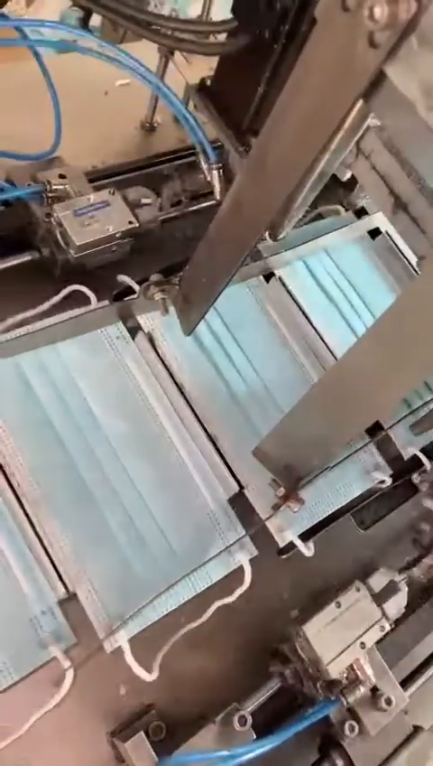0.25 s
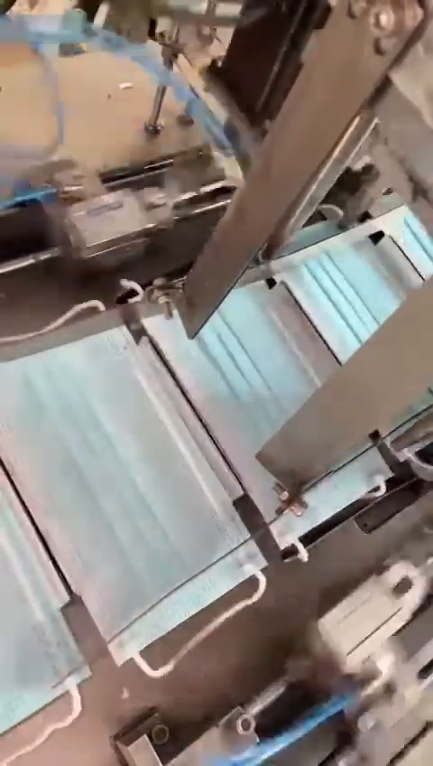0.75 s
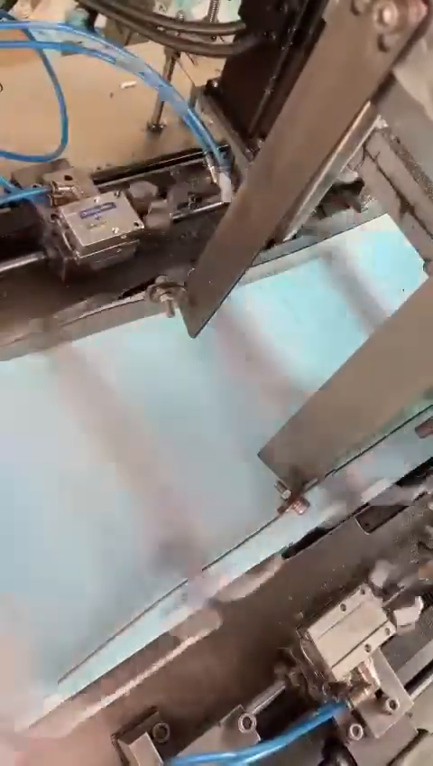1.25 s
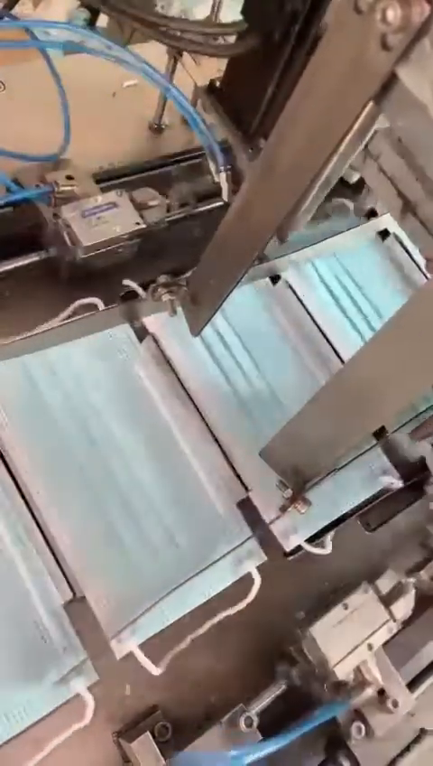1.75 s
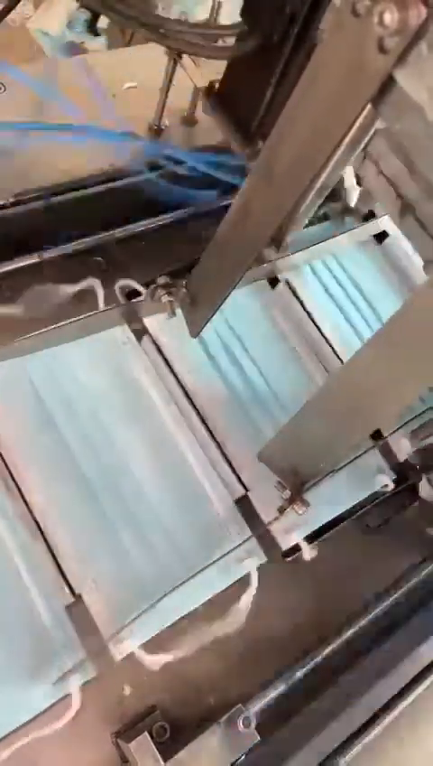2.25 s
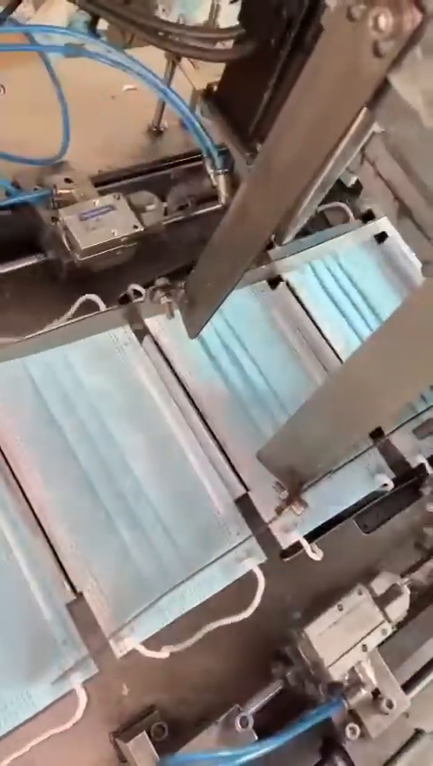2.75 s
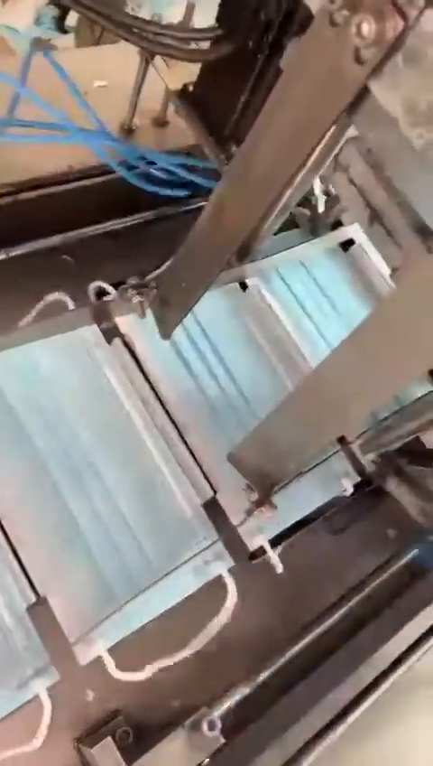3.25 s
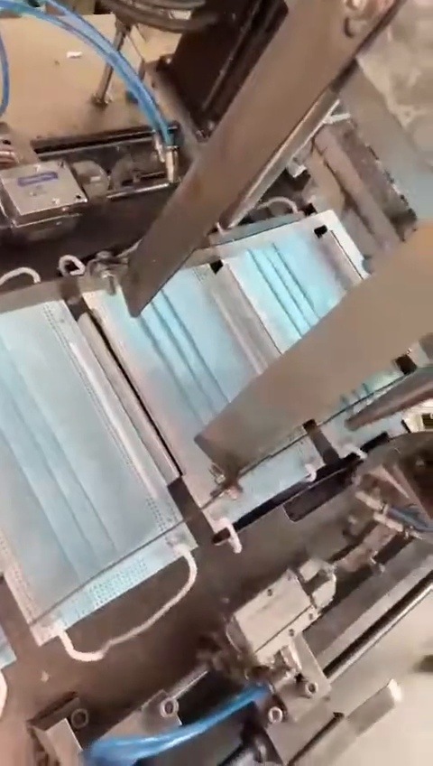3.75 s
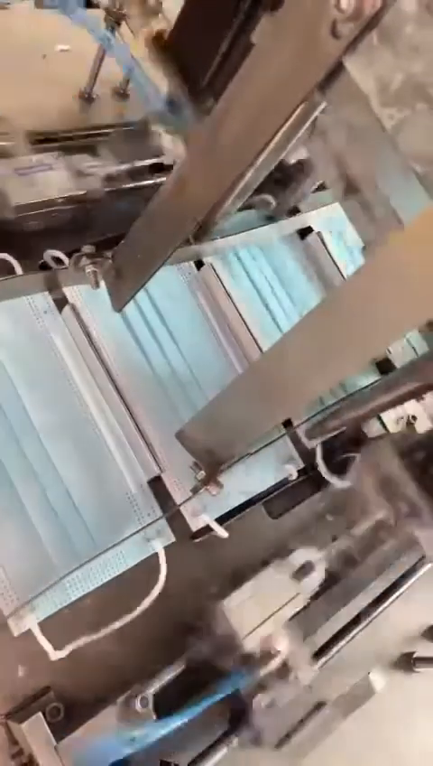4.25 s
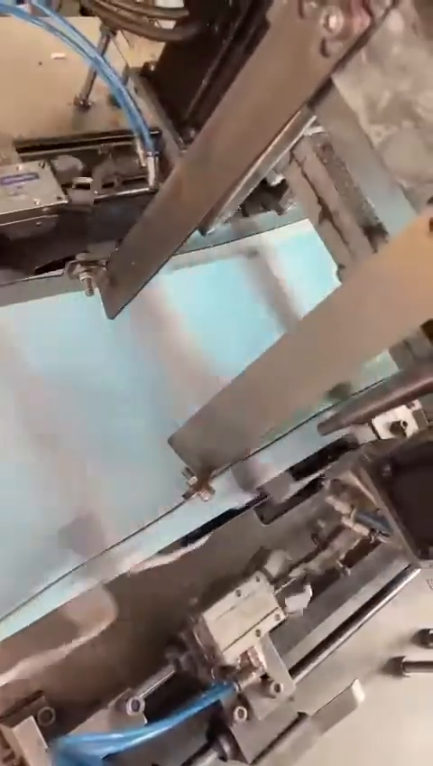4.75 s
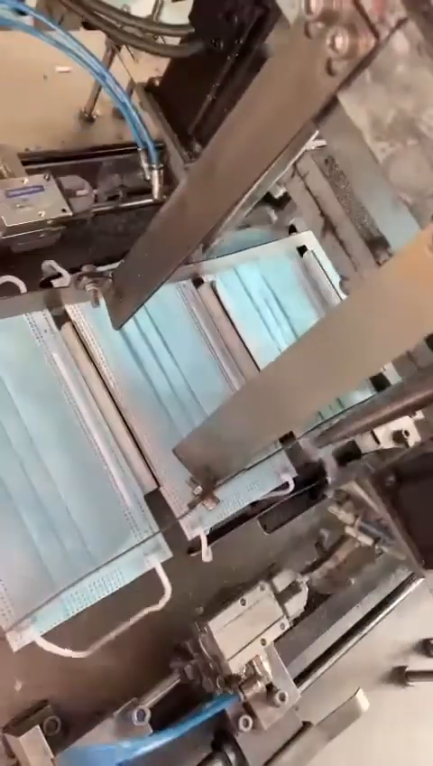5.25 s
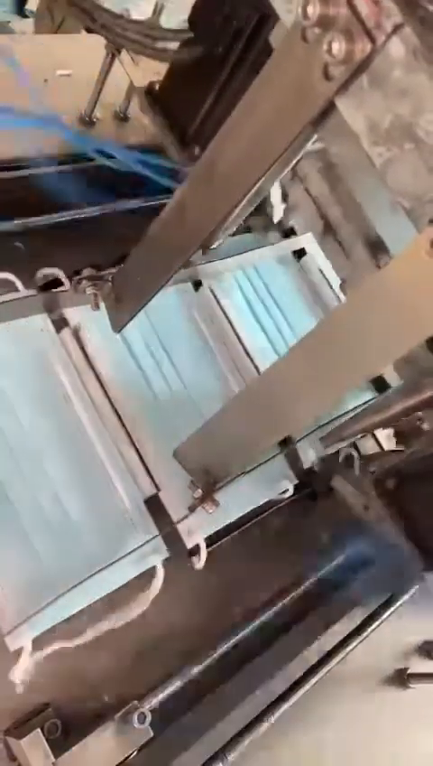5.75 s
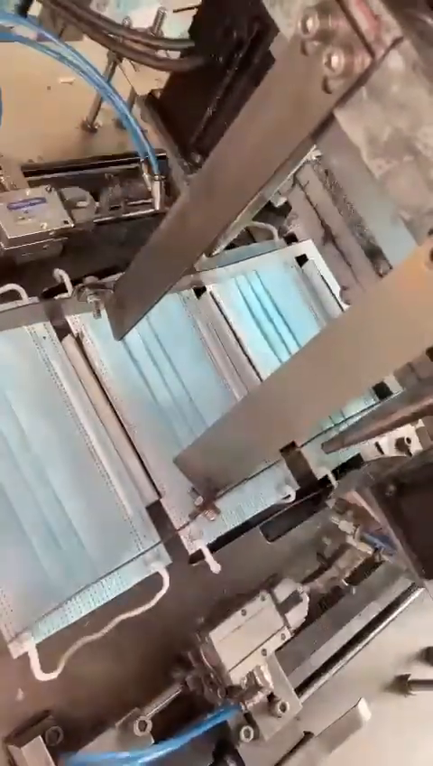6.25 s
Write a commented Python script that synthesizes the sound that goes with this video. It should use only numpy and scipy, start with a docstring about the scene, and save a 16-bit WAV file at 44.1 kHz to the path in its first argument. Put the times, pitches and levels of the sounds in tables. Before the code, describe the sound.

A face mask welding machine clatters close by in a factory, repeating the same cycle about every 0.9 seconds for just over six seconds. It opens with a bright metal clamp clack, a quick double knock and, at 0.2 seconds, a latch snap with a brief low panel hum. Crackly valve ticks follow, and a carriage rattles along its rail and slams into its stop at 0.6 seconds. Straight after, a dry crack starts a short, very high, stuttering welding squeal over soft low thumps. The squeal returns at about 1.5, 2.4, 3.3, 4.2, 5.0 and 5.9 seconds, each time just after a slam and followed by the clack, double knock and snap. Underneath, sliding parts rattle, the machine body rumbles and spent air hisses, swelling and easing with each cycle. The impacts carry a short, light room reflection, and the pace never changes.

```python
"""An ear-loop welding station on a factory floor, heard from close by, cycling every 0.88 s.
Each cycle opens on a valve tick; air cylinders throw the slides, and a carriage rushes along its rail
and slams into its stop. An ultrasonic horn lands and squeals for a seventh of a second as it bounces
on the anvil, stuttering over low thumps as the plastic melts. Then a clamp clacks, a slide seats with
a double knock and a latch sets a panel humming. Rattle, rumble and spent air run underneath."""
import sys
import numpy as np
from scipy import signal
from scipy.io import wavfile
from scipy.ndimage import uniform_filter1d

SR = 44100
rng = np.random.default_rng(int(sys.argv[2]) if len(sys.argv) > 2 else 0)


def transcribe(u):
    """Save the signal u as a 16-bit wav file named by the first command-line argument.

    u: samples, shape (n,) or (channels, n), limited to [-1, 1]; the rate is SR.
    q: integer samples, one column per channel.
    """
    v = np.clip(np.atleast_2d(u).T, -1, 1)
    q = np.round(v * 32767).astype(np.int16)
    wavfile.write(sys.argv[1], SR, q)


N = 286209
T = np.arange(N) / SR

# Welds, with their tones on hard plastic: (start [s], end [s], melt start [s], melt end [s],
# top tone [dB], low tone [dB], middle tone [dB])
WELDS = [(.655, .772, 0.72, 0.74, -28, -34, -35.5), (1.536, 1.673, 1.57, 1.61, -28, -34, -37),
         (2.381, 2.523, 2.43, 2.49, -25, -43, -32.5), (3.262, 3.407, 3.314, 3.365, -24.5, -46, -32),
         (4.151, 4.283, 4.201, 4.24, -31, -34, -42), (5.028, 5.171, 5.074, 5.14, -27, -30, -36.5),
         (5.903, 6.048, 5.952, 6, -28, -30.5, -38.5)]
# The horn's landings: (time [s], relative level [dB])
HORN_LANDINGS = [(0.655, -19.5), (1.5355, -25.5), (2.393, -24), (3.275, -23), (4.152, -23.5), (5.0369, -26),
                 (5.915, -26)]
# Machine cycles: (start [s], horn valve delay [s], rattle trim [dB], rumble trim [dB], rush trim [dB])
CYCLES = [(-.5405, .298, -0.5, 1.5, 0), (0.3414, .301, 0.5, 1, 0), (1.2201, .299, 1.5, 1.5, -0.5),
          (2.0779, .297, -0.5, 0.5, -2.5), (2.9616, .290, -1.5, 0.5, 0.5), (3.8374, .302, 1.5, 0.5, -1),
          (4.7243, .295, -0.5, -0.5, -1), (5.601, .2985, 0, -0.5, -3.5), (6.4834, .298, -6, 0, 0)]


def horn_squeal():
    """The unheard drive and the horn's bounce mix into four tones that close in on fifths of the drive."""
    drive_hz, hard_hz, melted_hz = 19889, 8206, 7960   # the bounce slows as the plastic melts
    wobble = drift(154)
    flickers = [drift(230) for _ in range(4)]
    apart = horn_skips()
    contact = amp(-22 * uniform_filter1d(apart, size=40))
    rebound = signal.lfilter([.004], [1, -.996], apart)   # after a gap the bounce restarts fast
    rasp = band(rng.standard_normal(N), 2600, 6100)
    grit = drift(420)   # uneven bounces roughen each tone
    out = np.zeros(N)
    for weld, (landing_s, _) in zip(WELDS, HORN_LANDINGS):
        start, end = weld[:2]
        on = slice(round(start * SR), round(end * SR))
        t = T[on]
        melt = np.interp(t, weld[2:4], [0, 1])
        bounce_hz = hard_hz + melt * (melted_hz - hard_hz + 150 * rebound[on])
        bounce_hz += (10 + 70 * melt) * wobble[on]
        bounce = 2 * np.pi * np.cumsum(bounce_hz) / SR
        drive = 2 * np.pi * drive_hz * t
        phases = drive - bounce, bounce, drive - 2 * bounce, 3 * bounce - drive
        levels = tone_levels(t, melt, weld, landing_s)
        tones = sum(level * amp((2.05 + 0.65 * melt) * flicker[on]) * np.sin(phase)
                    for level, phase, flicker in zip(levels, phases, flickers))
        tones *= 1 + (0.14 + 0.21 * melt) * grit[on]
        gate = np.clip(np.minimum(t - start, end - t) * 1500, 0, 1)
        out[on] += contact[on] * gate * (tones + amp(-43 + 2.05 * melt) * rasp[on])
    return out


def tone_levels(t, melt, weld, landing_s):
    """Top, bounce, low and middle tone: the low starts at first touch, the rest swell on landing."""
    start, _, melt_s, _, top_db, low_db, middle_db = weld
    touch_s, top_fade_db_per_s = .012, -190
    landed = np.clip((t - landing_s) / 0.009 + 1, .1, 1)
    top = amp(top_db + top_fade_db_per_s * np.maximum(t - melt_s, 0))
    # The first touch sounds brighter.
    bounce_db = np.interp(t - landing_s, [0, 2 * touch_s], [-37, -44])
    low_db = np.interp(t - start, [touch_s, 2 * touch_s], [-30, low_db])
    # Glide to the levels on melted plastic; the low tone gets there first.
    bounce = amp(bounce_db + melt * (-39.5 - bounce_db))
    low = amp(low_db + np.minimum(1.9 * melt, 1) * (-42 - low_db))
    middle = amp(middle_db + melt * (-34.5 - middle_db))
    return landed * top, landed * bounce, low, landed * middle


def horn_skips():
    """Share of contact lost: once the plastic softens, the horn skips at a near-steady beat."""
    # Longer, full losses of contact: (time [s], length [ms])
    breaks = [(1.543, 7.8), (1.554, 5.5), (1.563, 5.83), (1.574, 4.7), (1.628, 11.2), (1.652, 8.9),
              (4.186, 13.5), (4.245, 28), (5.142, 7.04), (6.009, 8.4), (6.032, 4.76)]
    skips_per_s, skip_s, depth = 80, .0021, .75
    softening = sum((T > melt_s) & (T < end) for _, end, melt_s, *_ in WELDS)
    rate = softening * skips_per_s * (1 + 0.151 * drift(40))
    skips = np.diff(np.floor(np.cumsum(rate / SR)), prepend=0) > 0
    apart = depth * np.minimum(np.convolve(skips, np.ones(round(skip_s * SR)))[:N], 1)
    for s, ms in breaks:
        apart[round(s * SR):round((s + ms / 1000) * SR)] = 1
    return apart


def horn_landing():
    """The horn meets the anvil with a short, dry crack."""
    # Horn on anvil: (pitch [Hz], level [dB], t60 [s])
    modes = [(1560, -4.5, 0.0087), (2680, -7, 0.011), (4930, -4.5, 0.013), (6860, -4, 0.0089),
             (9360, -27.5, 0.0083), (11370, -14, 0.015)]
    return strike(HORN_LANDINGS, modes, gain_db=1.5, crack_db=20, panel_db=-7,
                  rise_s=0.00053, length_s=.004, click=0.4, fall_db=-2.5)


def weld_thumps():
    """Soft low thumps, a couple of swings each, during each squeal and as it stops."""
    # Thumps during the squeals: (time [s], relative level [dB], pitch [Hz])
    during_squeal = [(0.658, -25, 69.4), (0.719, -21, 99.4), (0.744, -26, 106), (0.777, -33, 70.0),
                     (2.396, -27, 108), (5.06, -34.5, 90), (5.914, -29, 94.5), (1.58, -24.5, 83.4),
                     (1.613, -25.5, 113), (1.655, -23, 78.1), (2.442, -22.5, 142), (2.46, -25, 87.5),
                     (3.323, -25, 107), (3.348, -20, 165), (3.365, -28, 103), (4.153, -22.5, 68),
                     (4.169, -24.5, 94.2), (4.224, -22.5, 157.5), (4.244, -24.5, 77.5), (5.103, -22, 78.1),
                     (5.125, -21.5, 99.5), (5.141, -20, 103.3), (5.979, -23, 106), (6.005, -27, 64.6)]
    at_squeal_end = [(end - .012, -31, 60) for _, end, *_ in WELDS]
    out = np.zeros(N)
    for s, db, hz in list(during_squeal) + at_squeal_end:
        turns = np.arange(int(3 * SR / hz)) * hz / SR
        envelope = amp(db + 12.5) * turns * np.exp(-turns / 0.44)
        out[round(s * SR):][:len(turns)] += envelope * np.sin(2 * np.pi * turns)
    return out


def carriage_slam():
    """The carriage crunches into its stop and shakes the frame."""
    # Slams: (time [s], relative level [dB])
    hits = [(0.593, -20.5), (1.472, -21.5), (2.328, -21.5), (3.214, -21.5), (4.091, -22), (4.978, -21.5),
            (5.852, -22)]
    # Carriage and stop: (pitch [Hz], level [dB], t60 [s])
    modes = [(834, -6.5, 0.027), (1726, -6.5, 0.051), (2530, 1, 0.023), (2914, -1, 0.025),
             (3558, 8, 0.0071), (4010, -3, 0.011), (5075, -5, 0.02), (7480, -11.5, 0.022),
             (8650, -7, 0.014), (10700, -34, .025)]
    crunch = strike(hits, modes, gain_db=-1.5, crack_db=13, panel_db=-2.5,
                    rise_s=0.0039, length_s=0.02, click=0.13, fall_db=-2.5)
    return crunch + frame_thud(hits, delay_s=0.0019, gain_db=-9.5)


def clamp():
    """The clamp strikes with a bright, chattering clack."""
    # Clacks: (time [s], relative level [dB])
    hits = [(0.001, -23), (0.8741, -24.5), (1.764, -24), (2.621, -25), (3.505, -25.5), (4.3825, -23),
            (5.2675, -24), (6.1462, -24)]
    # The clamp's ring: (pitch [Hz], level [dB], t60 [s])
    modes = [(1804, -21, 0.12), (2554, 0, 0.041), (2633, -0.5, 0.028), (3240, 1.5, 0.02),
             (3597, 4.5, 0.023), (4200, -19, 0.029), (5050, -6.5, 0.037), (5370, -10.5, 0.038),
             (7470, -8.5, 0.098), (8680, -7.5, 0.048), (11000, -25, 0.05)]
    return strike(hits, modes, gain_db=-3, crack_db=20, panel_db=-3.5,
                  rise_s=0.00057, length_s=.021, click=0.36, fall_db=-4.5)


def slide_seat():
    """A slide seats with two knocks, the second harder, and nudges the frame."""
    # Knocks: (time [s], relative level [dB])
    hits = [(0.045, -22), (0.06, -17), (0.926, -24), (0.939, -17), (1.814, -22.5), (1.83, -18),
            (2.673, -22), (2.688, -18.5), (3.556, -25.5), (3.571, -19), (4.432, -26.5), (4.447, -22),
            (5.319, -32), (5.334, -22), (6.197, -26.5), (6.211, -19)]
    # The seat's ring: (pitch [Hz], level [dB], t60 [s])
    modes = [(465, -10, 0.057), (670, -5.5, 0.051), (774, -4.5, 0.044), (1670, -3, 0.0087),
             (2500, -12, 0.011), (3004, 7, 0.0096), (3650, -2.5, 0.0177), (4650, -19, 0.014),
             (7530, -11, 0.045), (8700, -15, 0.055), (9240, -8, 0.046), (10700, -34, .04)]
    knocks = strike(hits, modes, gain_db=-6, crack_db=14, panel_db=4,
                    rise_s=0.00075, length_s=.022, click=0.54, fall_db=-8)
    return knocks + frame_thud(hits, delay_s=0.00315, gain_db=-20)


def latch():
    """The latch snaps, and a soft late push sets the panel behind it humming."""
    # Snaps: (time [s], relative level [dB])
    hits = [(0.182, -25), (1.066, -25), (1.95, -25.5), (2.806, -25), (3.689, -24.5), (4.564, -26),
            (5.451, -27), (6.33, -25.5)]
    # The latch's ring: (pitch [Hz], level [dB], t60 [s])
    modes = [(756.2, -14.5, 0.072), (1520, -38, 0.043), (1930, 4.5, 0.014), (2860, -1.5, 0.014),
             (3450, -1, 0.012), (4030, -20, .02), (4942, -2, 0.0098), (7300, -2.5, 0.011),
             (9700, -54, .015), (11400, -9, 0.0136)]
    snap = strike(hits, modes, gain_db=1, crack_db=11, panel_db=1.5,
                  rise_s=0.00018, length_s=0.023, click=0.43, fall_db=-28)
    panel_hz = 229.5
    hum = ring(blows(hits, delay_s=.012, gain_db=12.8), panel_hz, t60=0.15)
    return snap + ring(hum, panel_hz, t60=0.026) * 60 / SR   # ringing twice softens the attack


def strike(hits, modes, gain_db, crack_db, panel_db, **bounce_shape):
    """Bounces ring the body, leak out as a broad crack and stir the panels' countless small modes."""
    push = chatter(hits, **bounce_shape)
    t = np.arange(2600) / SR
    panel_tail = band(rng.standard_normal(len(t)), 490, 3820) * decay(t, 0.0613)
    panels = signal.fftconvolve(push, panel_tail)[:N]
    body = sum(amp(db) * ring(push * amp(2 * drift(3.8)), hz, t60) for hz, db, t60 in modes)
    crack = band(push, 1320, 7300)
    return amp(gain_db) * (body + amp(crack_db) * crack + amp(panel_db) * panels)


def chatter(hits, rise_s, length_s, click, fall_db):
    """Each contact is a first click, then a run of small bounces that swells, fades and stops."""
    push = np.zeros(N + SR)
    t = np.arange(int(length_s * SR) + 2) / SR
    envelope = np.minimum(t / rise_s, 1) * amp(fall_db * t / length_s) / np.sqrt(len(t))
    for s, db in hits:
        bounces = envelope * rng.standard_normal(len(t)) * amp(2.67 * rng.standard_normal(len(t)))
        bounces[1] += click
        push[round(s * SR):][:len(t)] += amp(db) * bounces
    return push[:N]


def frame_thud(hits, delay_s, gain_db):
    """A heavy contact reaches the frame as one blunt blow."""
    # The frame's low ring: (pitch [Hz], level [dB], t60 [s])
    modes = [(110, -16, 0.46), (217.3, -5.5, 0.19), (262, 4, 0.1), (437.5, -2.5, 0.14)]
    push = blows(hits, delay_s, gain_db)
    return sum(amp(db) * ring(push, hz, t60) for hz, db, t60 in modes)


def valve_ticks():
    """Valves and pawls tick in sharp bursts of crackle; the dull part lasts a little longer."""
    # Ticks of one cycle: (time in cycle [s], relative bright level [dB], relative dull level [dB])
    ticks = [(0, -31, -35.5), (.059, -24.5, -29.5), (.096, -34, -33.5), (.126, -35, -36),
             (.183, -31.5, -28.5), (.237, -49, -28), (.49, -60, -45), (.58, -23, -28), (.80, -56, -61.5),
             (.831, -43, -49)]
    out = np.zeros(N + SR)
    t = np.arange(2000) / SR
    for start, horn_valve_s, *_ in CYCLES:
        for after, bright_db, dull_db in list(ticks) + [(horn_valve_s, -26, -35.5)]:
            crackle = rng.standard_normal((2, len(t))) * amp(rng.standard_normal())
            crackle[:, 1] *= 3.2 * (bright_db > -28)   # the strong ones open with a snap
            bright = band(crackle[0] * (decay(t, 0.0172) + 0.18 * decay(t, 0.076)), 3700, 14000)
            dull = band(crackle[1] * (decay(t, 0.028) + 0.33 * decay(t, 0.091)), 820, 4130)
            tick = amp(bright_db - 7) * bright + amp(dull_db - 0.5) * dull
            if 0 < start + after < N / SR:
                out[round((start + after) * SR):][:len(t)] += tick
    return out[:N]


def rail_rush():
    """Before the slam, ball bearings rattle densely into the resonances of the rail."""
    # The carriage's run: (time in cycle [s], level [dB])
    swell = [(.12, -58.5), (.13, -42), (.19, -32), (.235, -50.5), (.25, -38)]
    # Rail resonances: (centre [Hz], width [Hz], level [dB])
    resonances = [(970, 560, -2.5), (1640, 480, -3), (2040, 640, -4), (2600.4, 216, 4), (3100, 510, -5.5),
                  (3720, 270, -5.5), (4946, 1060, -13), (7420, 460, -20), (9226, 140, -14.5)]
    clock, *_, trim_db = cycle_clock()
    level = amp(np.interp(clock, *np.transpose(swell), left=-120, right=-120) + trim_db)
    balls = rng.standard_normal(N) + .9 * grains(per_s=1200, spread_db=4.5)
    rail = sum((-1) ** k * amp(db) * band(balls, hz - width / 2, hz + width / 2)
               for k, (hz, width, db) in enumerate(resonances))
    return uniform_filter1d(level, size=300) * unit_rms(rail)


def slide_motion():
    """Slides rattle along their rails, the frame rumbles, spent air hisses."""
    # Tone colours of slides, frame and air: (frequency [Hz], relative density [dB])
    rattle_colour = [(240, -41), (400, -11), (573, 4), (782, -5.5), (1040, 0.5), (1260, 7), (1390, 0),
                     (2590, 1.5), (7000, -22.5), (9100, -43), (15400, -120)]
    rumble_colour = [(18, -64), (30, -27), (64, -13.5), (119, 3), (156, -10.5), (233, -2), (310, -8),
                     (658, -15.5), (900, -17), (1170, -33), (1980, -120)]
    hiss_colour = [(2060, -13.5), (3500, -2.5), (4450, -11), (5090, -7), (6400, -9), (10700, -13.5),
                   (12000, -36), (12500, -80), (16300, -106), (22000, -120)]
    # The slides' stroke: (time in cycle [s], rattle [dB], rumble [dB], hiss [dB])
    stroke = [(0, -47.5, -48, -54), (.08, -49.5, -49.5, -49.5), (.21, -40, -47, -47.5),
              (.30, -55, -43, -50), (.42, -41.5, -40.5, -54.5), (0.529, -48.5, -54.5, -54.5),
              (0.669, -53, -43.5, -57), (.74, -56.5, -52.5, -62.5), (.86, -57.5, -52.5, -59.5)]
    times, *curves = np.transpose(stroke)
    clock, rattle_trim_db, rumble_trim_db, _ = cycle_clock()
    rattle_db, rumble_db, hiss_db = [np.interp(clock, times, curve) for curve in curves]
    gritty = rng.standard_normal((2, N)) + .7 * grains(per_s=1500, spread_db=4.5)
    rattle = coloured(rattle_colour, gritty, flicker_db=4)
    rumble = coloured(rumble_colour, rng.standard_normal((2, N)), flicker_db=4.5)
    hiss = coloured(hiss_colour, gritty, flicker_db=4.5)
    return (amp(rattle_db + rattle_trim_db) * rattle + amp(rumble_db + rumble_trim_db) * rumble
            + amp(hiss_db) * hiss)


def hall(x):
    """Dense reflections off the machine bed and walls."""
    t = np.arange(int(.4 * SR)) / SR
    envelope = decay(t, t60=0.317) * np.minimum(t / 0.0011, 1)
    tail = band(rng.standard_normal(len(t)), 260, 10500) * envelope
    return signal.fftconvolve(x, tail / np.sqrt(np.sum(tail ** 2)))[:N]


def cycle_clock():
    """Time since the cycle began, and that cycle's rattle, rumble and rush trims."""
    rows = np.array(CYCLES)
    start, _, *trims_db = rows[np.searchsorted(rows[:, 0], T, side="right") - 1].T
    return T - start, *trims_db


def coloured(spectrum, noise_pair, flicker_db):
    """Third-octave bands of noise, each at its own level and flickering; rms 1."""
    hz, db = np.transpose(spectrum)
    edges = np.geomspace(hz[0], hz[-1], num=round(3 * np.log2(hz[-1] / hz[0])) + 1)
    flickers = [drift(24.6) for _ in range(3)]
    out = 0
    for k, (low, high) in enumerate(zip(edges, edges[1:])):
        level_db = np.interp(np.log(low * high) / 2, np.log(hz), db)
        out += amp(level_db + flicker_db * flickers[k % 3]) * band(noise_pair[k % 2], low, high)
    return unit_rms(out)


def blows(hits, delay_s, gain_db):
    """One clean, delayed impulse for each hit."""
    push = np.zeros(N)
    for s, db in hits:
        push[round((s + delay_s) * SR)] = amp(db + gain_db)
    return push


def ring(push, hz, t60):
    """A unit click sets a sine of height 1 ringing."""
    r, w = decay(1 / SR, t60), 2 * np.pi * hz / SR
    return signal.lfilter([0, np.sin(w)], [1, -2 * r * np.cos(w), r * r], push + 1e-18)


def grains(per_s, spread_db):
    """Random clicks of very uneven size; rms 1."""
    size = amp(spread_db * np.minimum(rng.exponential(1, N), 4)) * rng.choice([-1, 1], N)
    return unit_rms(size * (rng.random(N) < per_s / SR))


def drift(hz):
    """A random wander of rms 1: noise twice through a one-pole low-pass."""
    r = np.exp(-2 * np.pi * hz / SR)
    return unit_rms(signal.lfilter([1], [1, -2 * r, r * r], rng.standard_normal(N + SR))[SR:])


def band(x, low_hz, high_hz):
    return signal.sosfilt(signal.butter(2, [low_hz, high_hz], "band", fs=SR, output="sos"), x)


def decay(t, t60):
    return amp(-60 * t / t60)


def amp(db):
    return 10 ** (np.asarray(db) / 20)


def unit_rms(x):
    return x / np.sqrt(np.mean(x ** 2) + 1e-20)


def scene():
    """The station in mono; only the impacts and ticks feed the hall."""
    hits = clamp() + slide_seat() + latch() + carriage_slam() + horn_landing() + valve_ticks()
    mix = hits + amp(-14) * hall(hits) + horn_squeal() + weld_thumps() + rail_rush() + slide_motion()
    return mix[None]


def record(dry):
    """The deep bass is thinned and the top is cut steeply."""
    low_cut_hz, stopband_hz = 40, 12790
    thin = signal.sosfilt(signal.butter(3, low_cut_hz, "high", fs=SR, output="sos"), dry)
    return signal.sosfilt(signal.cheby2(14, 80, stopband_hz, fs=SR, output="sos"), thin)


dry = scene()
out = record(dry)
transcribe(out)
```